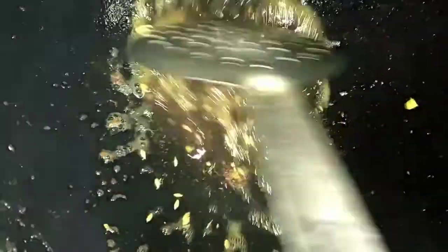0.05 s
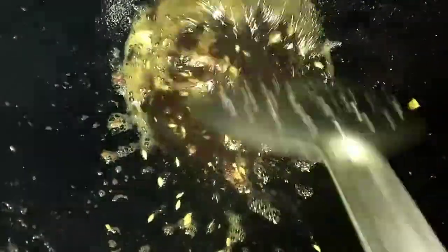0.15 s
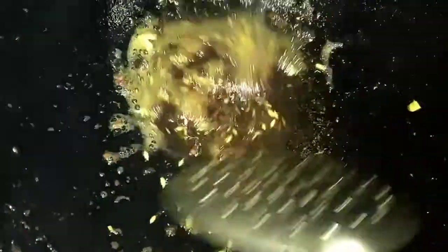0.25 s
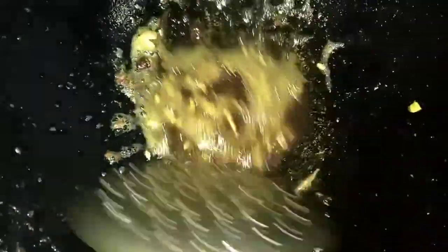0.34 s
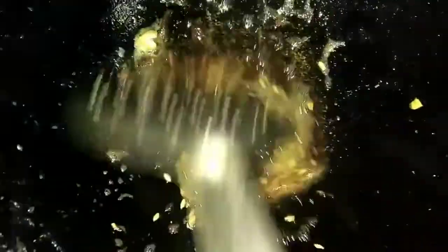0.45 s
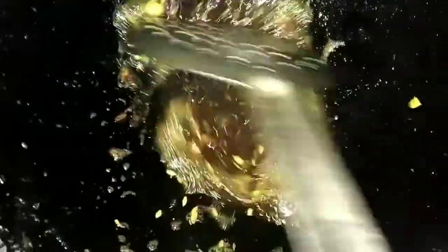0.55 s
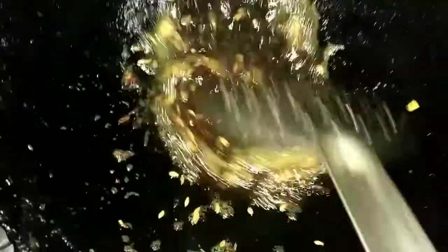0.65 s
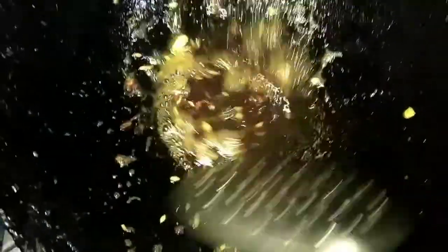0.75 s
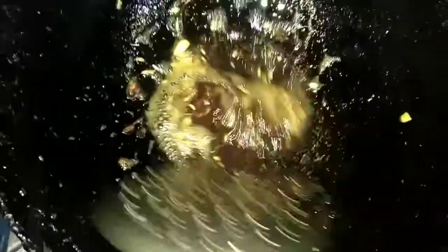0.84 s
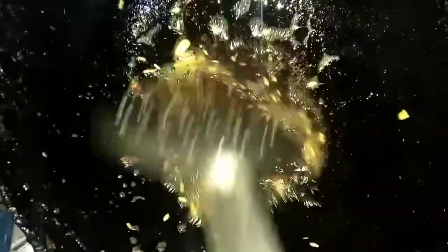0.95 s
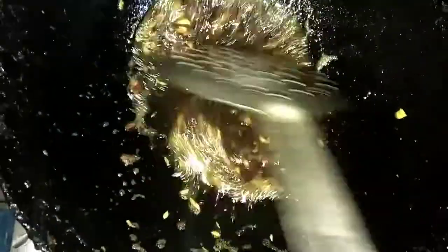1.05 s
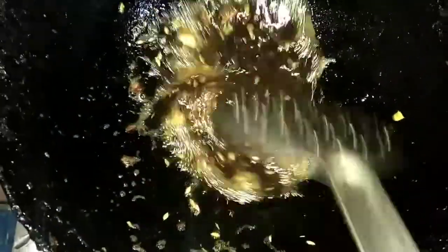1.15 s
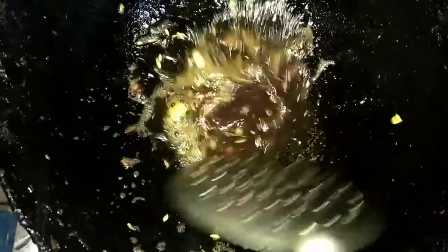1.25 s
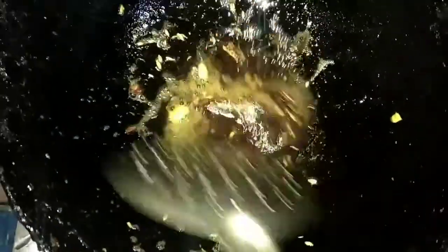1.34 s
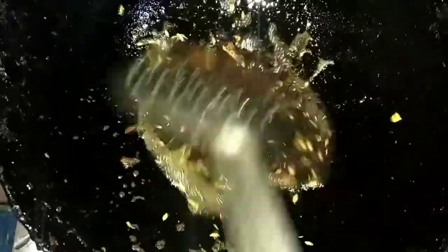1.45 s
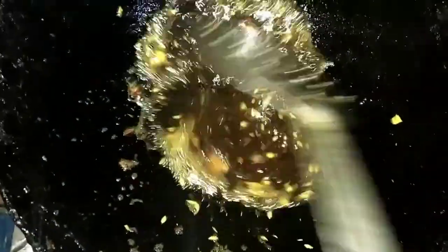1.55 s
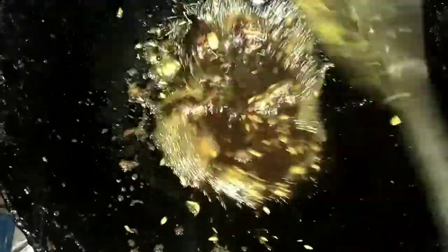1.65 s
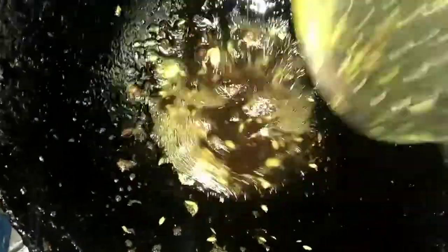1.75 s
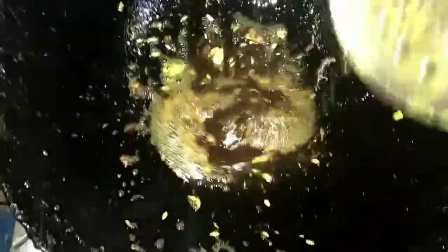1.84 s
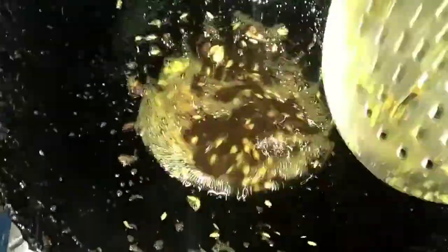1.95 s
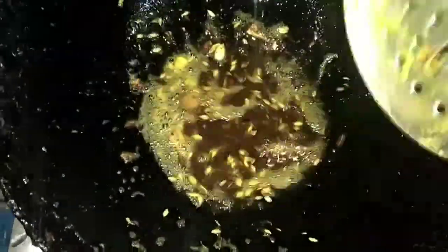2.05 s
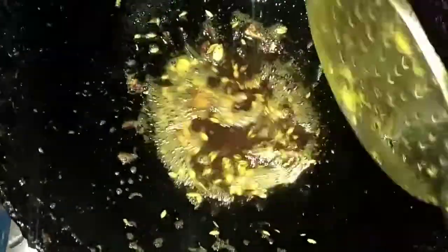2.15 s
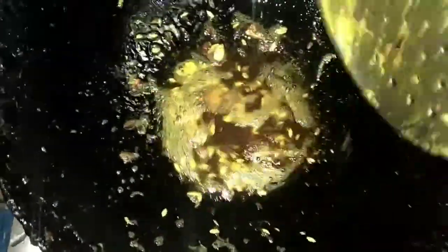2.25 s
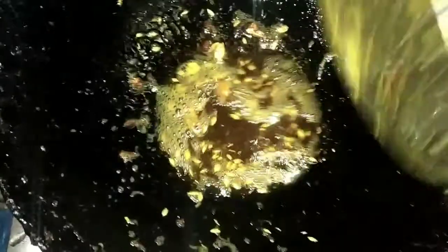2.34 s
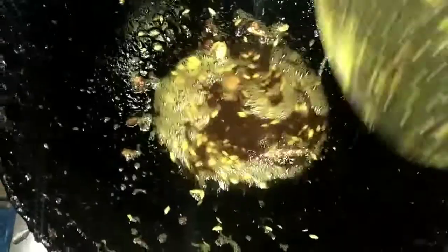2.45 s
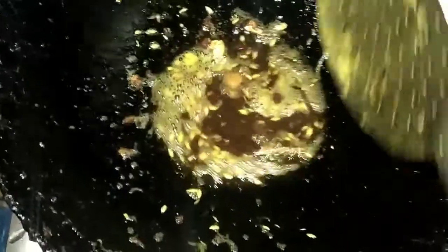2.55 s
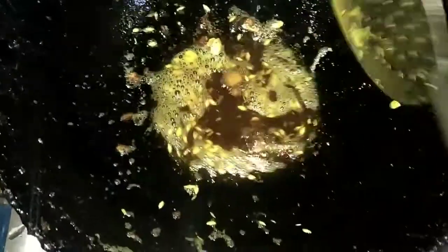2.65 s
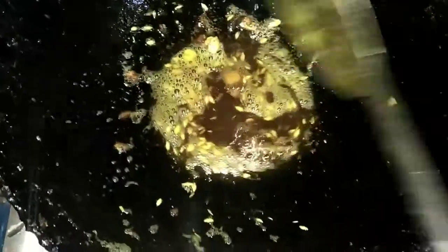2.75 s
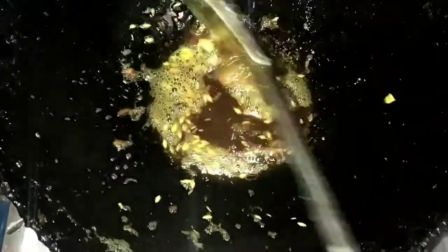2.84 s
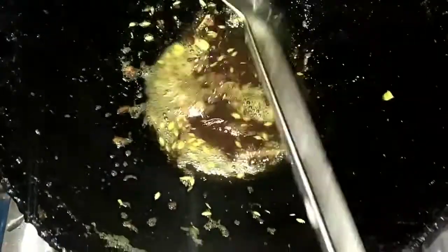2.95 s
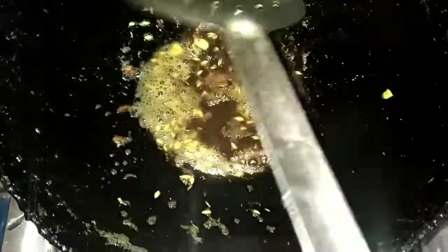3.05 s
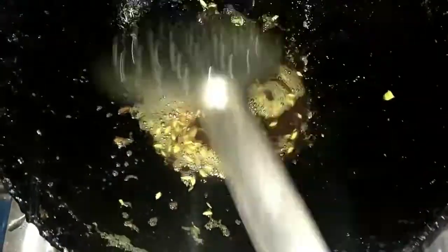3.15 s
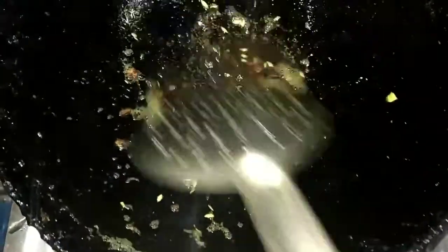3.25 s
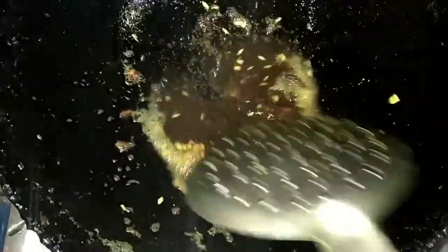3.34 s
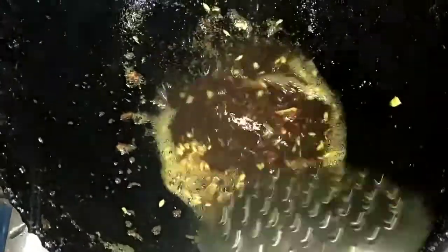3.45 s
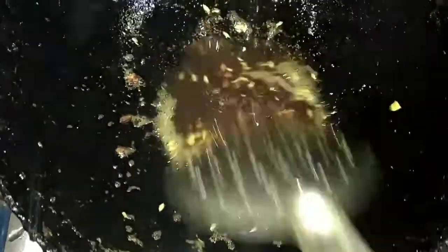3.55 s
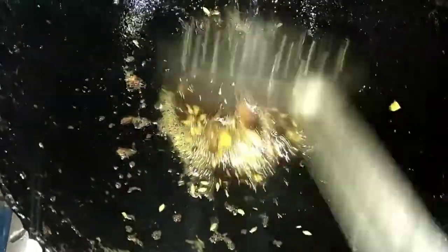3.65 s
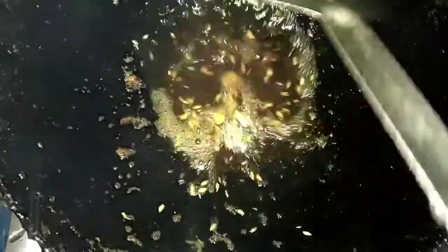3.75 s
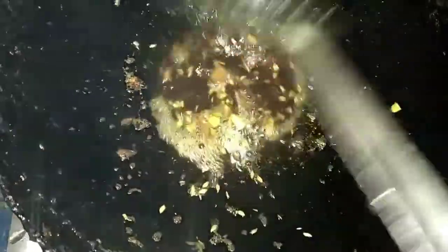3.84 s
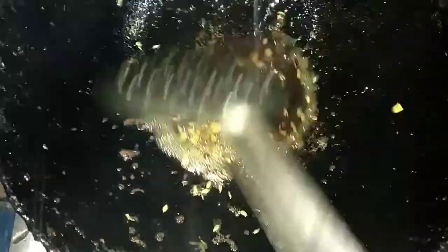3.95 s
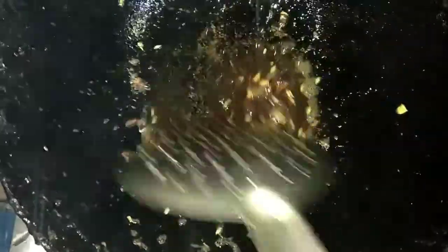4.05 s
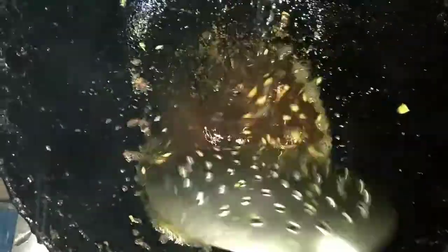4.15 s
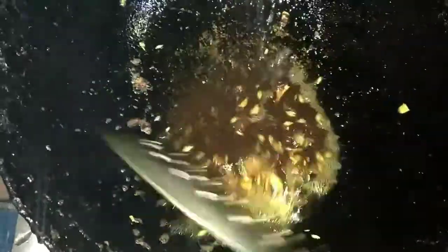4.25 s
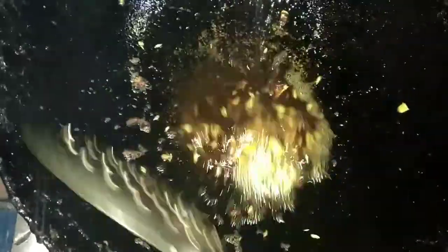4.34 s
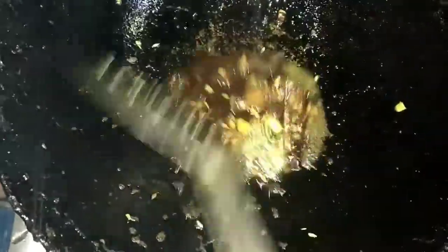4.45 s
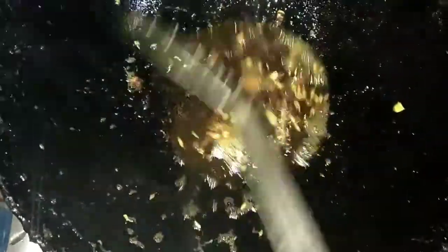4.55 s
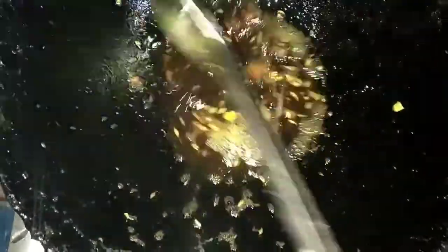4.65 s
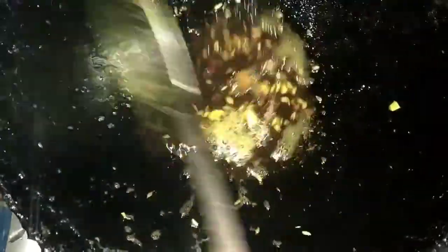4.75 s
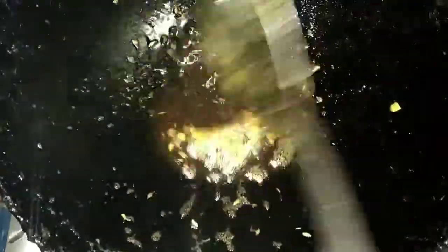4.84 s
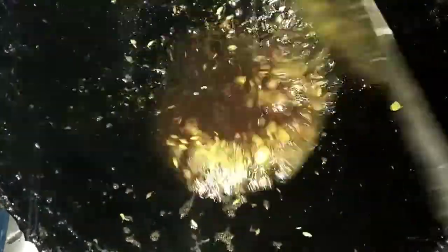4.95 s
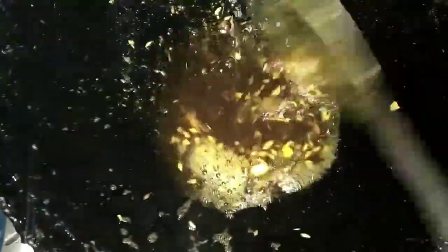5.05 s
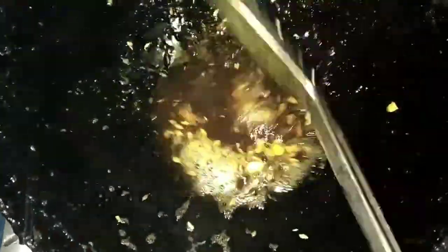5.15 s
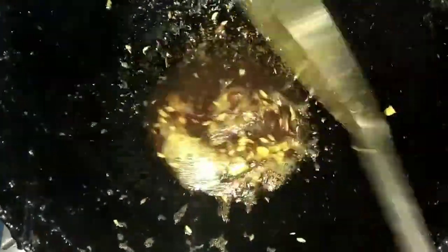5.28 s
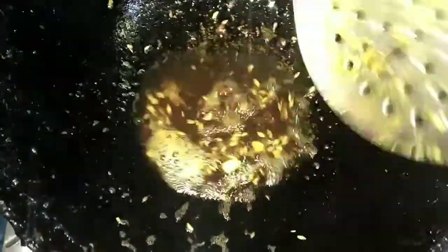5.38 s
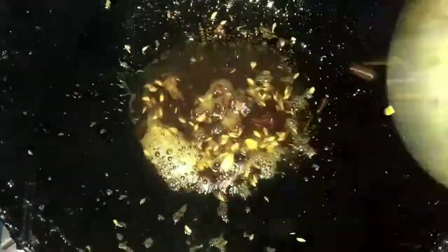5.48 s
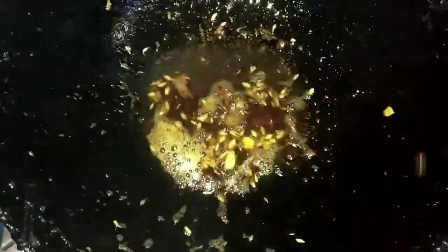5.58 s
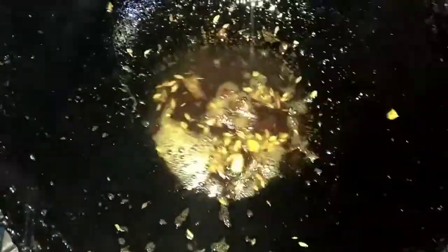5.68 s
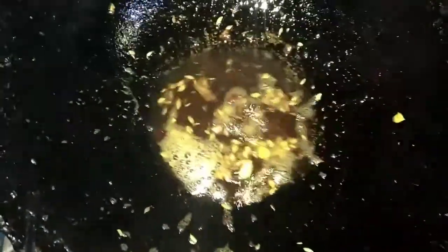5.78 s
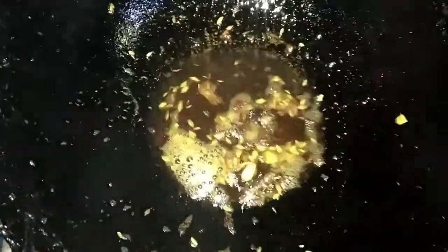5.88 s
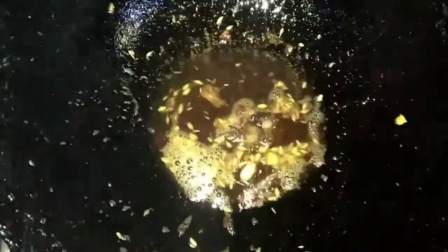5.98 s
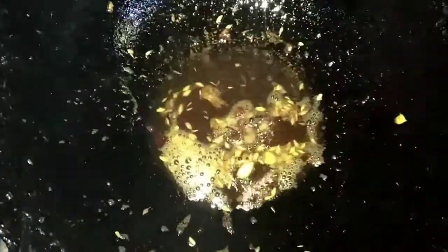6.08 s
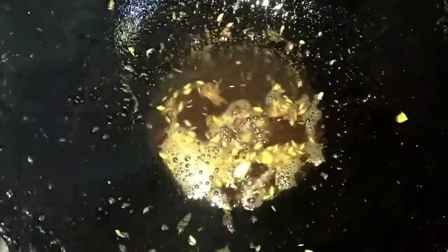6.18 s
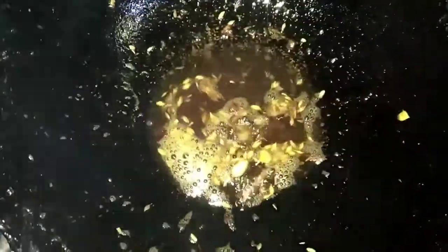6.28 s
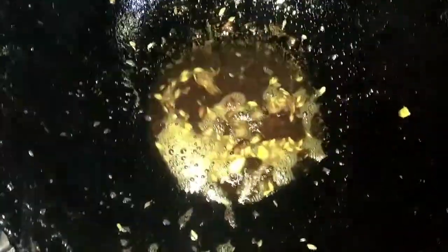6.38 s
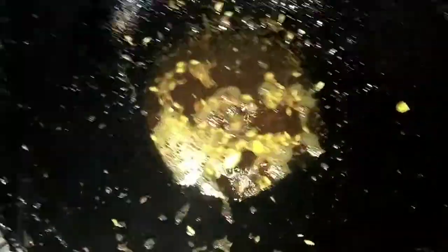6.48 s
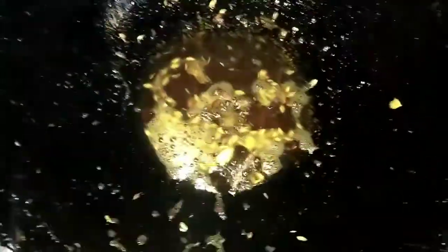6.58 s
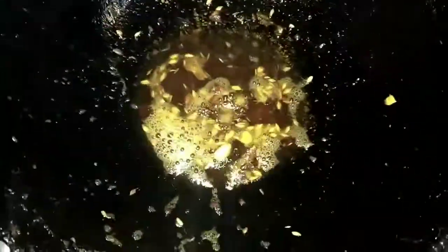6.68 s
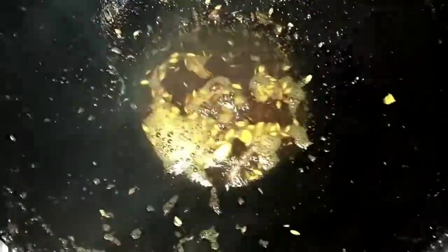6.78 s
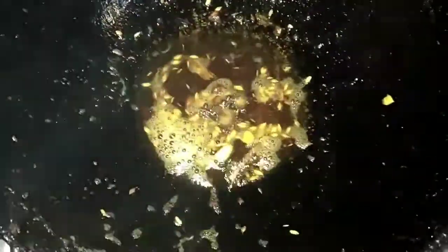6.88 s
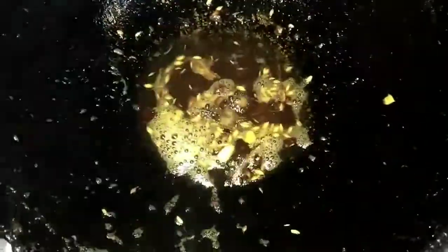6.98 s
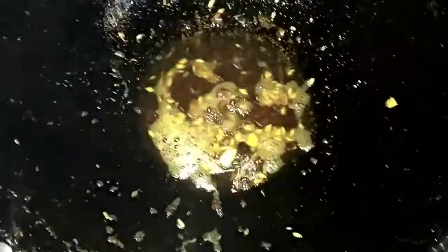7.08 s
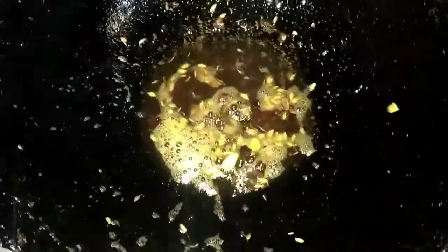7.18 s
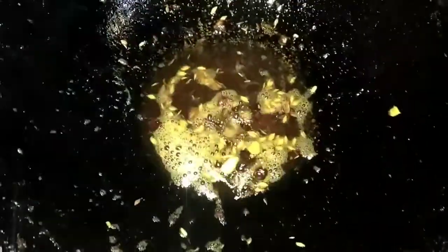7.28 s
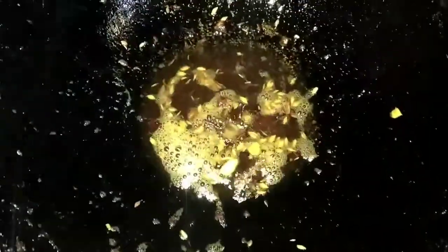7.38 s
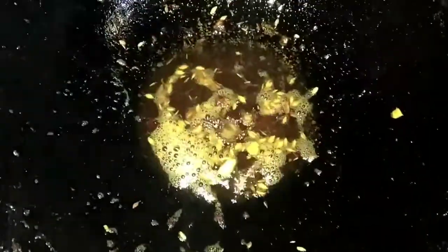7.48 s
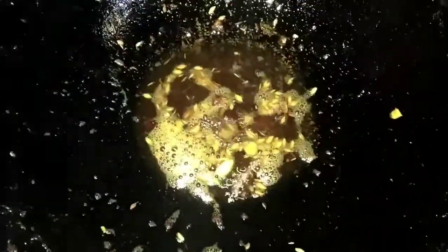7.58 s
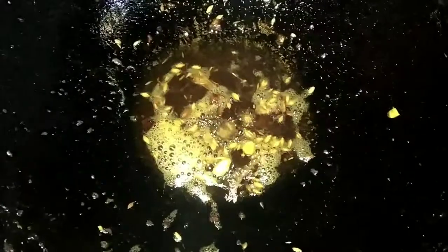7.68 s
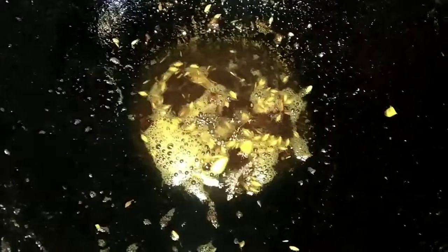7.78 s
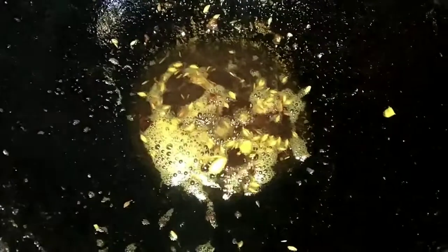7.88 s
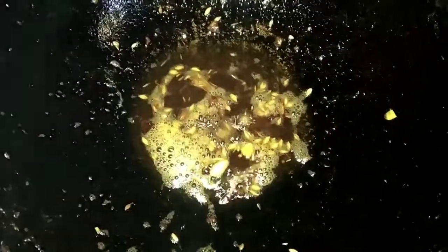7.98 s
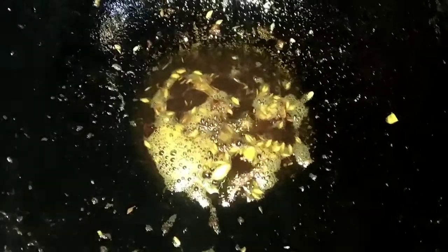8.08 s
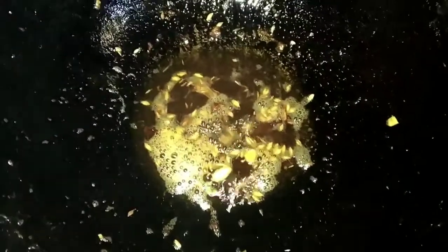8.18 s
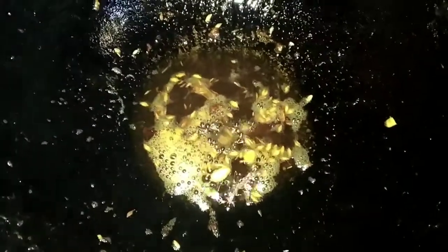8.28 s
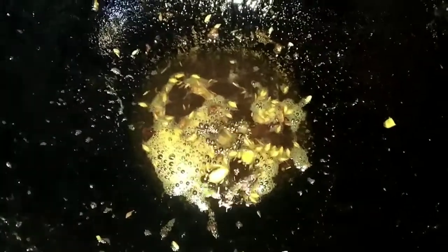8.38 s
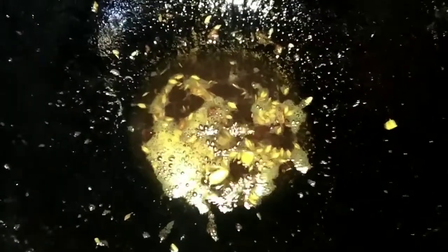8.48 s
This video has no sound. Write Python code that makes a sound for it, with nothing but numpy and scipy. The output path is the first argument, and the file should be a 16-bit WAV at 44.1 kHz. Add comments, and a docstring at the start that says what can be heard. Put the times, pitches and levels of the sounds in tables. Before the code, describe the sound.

Whole spices fizz and spit in hot oil while a steel skimmer scrapes and knocks the pan, then rattles as it is laid down.

```python
"""In a small, hard-walled kitchen, whole spices fry in a steel pan close under two microphones.
Thousands of tiny bubbles make the hot oil fizz, and it spits in short, sharp snaps. A steel skimmer
stirs, scrapes and knocks, setting the metal ringing, then rattles as it is laid down. Further off a
utensil clinks. There is a low room murmur, handling rumble and one faint hoot. The left microphone is
a little further from the pan, so it hears the pan slightly later and softer."""
import sys
import numpy as np
from scipy import signal
from scipy.fft import rfft, irfft, next_fast_len
from scipy.io import wavfile
from scipy.ndimage import uniform_filter1d

SR = 44100
rng = np.random.default_rng(int(sys.argv[2]) if len(sys.argv) > 2 else 0)


def log_audio(samples):
    """Write samples as a 16-bit WAV file to the path given in sys.argv[1]."""
    # one column per channel
    frames = np.atleast_2d(samples).T
    # limit to full scale, then quantise
    limited = np.clip(frames, -1, 1)
    pcm = np.round(limited * 32767).astype(np.int16)
    wavfile.write(sys.argv[1], SR, pcm)


N = 375682


def gain_of(db):
    return 10 ** (np.asarray(db) / 20)


def unit_rms(x):
    return x / np.sqrt(np.mean(x ** 2) + 1e-20)


def unit_peak(x):
    return x / abs(x).max()


def value_at(points, hz):
    """Read between the (frequency, value) points of a curve."""
    f, value = np.transpose(points)
    return np.interp(np.log(hz + 1), np.log(f + 1), value)


def add(mix, start_s, sound):
    part = mix[..., round(start_s * SR):][..., :sound.shape[-1]]
    part += sound[..., :part.shape[-1]]


def follow(rows, column):
    """Turn a dB column into a gain for each sample, silent outside its rows."""
    rows, gain = np.asarray(rows), np.zeros(N)
    t = np.arange(rows[0, 0], rows[-1, 0], 1 / SR)
    add(gain, t[0], gain_of(np.interp(t, rows[:, 0], rows[:, column])))
    return gain


def excite(drive, response):
    """Every sample of the drive sets off its own copy of the response."""
    return signal.oaconvolve(drive, response)[:N]


def colour(x, spectrum):
    """Give a sound a tone colour, using a filter of energy 1 that never sounds ahead of its input."""
    log_gain = np.log(gain_of(value_at(spectrum, abs(np.fft.fftfreq(8192, 1 / SR)))))
    taps = np.fft.ifft(np.exp(np.conj(signal.hilbert(log_gain)))).real[:4096]
    return excite(x, taps / np.linalg.norm(taps))


def stereo_pair(a, b, likeness):
    """Left is a; right blends a (likeness 1) with b (likeness 0), frequency by frequency."""
    size = next_fast_len(len(a))
    same = np.clip(value_at(likeness, np.fft.rfftfreq(size, 1 / SR)), -1, 1)
    right = irfft(same * rfft(a, size) + np.sqrt(1 - same ** 2) * rfft(b, size), size)
    return np.array([a, right[:len(a)]])


def ring(modes, spot_db=0):
    """Struck metal rings with its own tones (modes); t60 is the time each takes to fade by 60 dB."""
    hz, db, t60 = np.transpose(modes)[:, :, None]
    t = np.arange(0, min(t60.max(), .6), 1 / SR)
    db = db + spot_db + 1.5 * rng.standard_normal(hz.shape)  # each blow lands at another spot
    sound = (gain_of(db - 60 * t / np.maximum(t60, .01)) * np.sin(2 * np.pi * hz * t)).sum(0)
    return sound / np.linalg.norm(sound)


def gripped(modes, pitch_share=.012, spread_db=4):
    """Each contact bends the modes a little in pitch and level."""
    spread = [[pitch_share * hz, spread_db, 0] for hz, _, _ in modes]
    return np.array(modes) + rng.standard_normal((len(modes), 3)) * spread


def clicks(per_s, spread_db):
    """Clicks at random moments, a few of them large."""
    when, luck, sign = rng.random((3, N // 4))[:, :round(per_s * N / SR)]
    size = gain_of(spread_db * np.minimum(-np.log(luck + 1e-9), 5)) * (2 * sign - 1)
    return unit_rms(np.bincount((when * N).astype(int), size, N))


def flicker(length, smooth_samples, depth_db):
    """A gain that wavers at random."""
    return gain_of(depth_db * unit_rms(uniform_filter1d(rng.standard_normal(length), smooth_samples)))


def pressure(rows, column, fall_scale=1):
    """Gain of all contacts: up 20 dB per rise time, held, then down 20 dB per scaled fall time."""
    out = np.zeros(N)
    for row in rows:
        s, rise, hold, fall = row[0], max(row[1], .001), max(row[2], 0), max(row[3], .003) * fall_scale
        t = np.arange(max(-2 * rise, -s), hold + 3 * fall, 1 / SR)
        shape_db = 20 * (np.minimum(t / rise, 0) - np.maximum(t - hold, 0) / fall)
        add(out, s + t[0], gain_of(row[column] + shape_db))
    return out


MURMUR_COLOUR = [(12, -102), (20, -23), (34, 0.5), (65, 3), (107, -6), (150, -4.5), (436, -15.5),
                 (474, -14.5), (561, -8), (649, -16.5), (853, -15.5), (1350, -20), (3000, -19), (3900, -53),
                 (6600, -120)]  # tone of the murmur: f/Hz, level/dB
MURMUR_LEVEL = [(0.0, -50.5), (1.56, -48.5), (1.83, -58.5), (2.8, -55.5), (3.98, -47), (4.8, -58.5),
                (5.1, -46), (5.5, -58.5), (6.7, -53.5), (7.2, -57.5), (8.52, -56)]  # room murmur plus handling rumble: t/s, level/dB
MURMUR_LIKENESS = [(60, 0.83), (300, 0.83), (700, 0.28), (1400, 0.0097)]  # how alike left and right are: f/Hz, likeness/0-1
def murmur():
    """Low room murmur, plus handling rumble while the cook stirs; left and right share the bass."""
    a, b = (colour(rng.standard_normal(N), MURMUR_COLOUR) for _ in range(2))
    return follow(MURMUR_LEVEL, 1) * stereo_pair(a, b, MURMUR_LIKENESS)


ECHO_DECAY = [(60, .35), (300, 0.45), (1000, 0.069), (4000, 0.048), (12000, 0.087)]  # how long the kitchen echoes: f/Hz, t60/s
ECHO_LEVEL = [(60, -64.5), (300, -10.5), (1000, -6.5), (4000, 7), (12000, 15)]  # the echo against the sound sent into it: f/Hz, level/dB
ECHO_LIKENESS = [(60, 0.93), (500, 1), (1200, 1), (3000, 0)]  # how alike left and right echoes are: f/Hz, likeness/0-1
BOUNCES = [(.0045, -12), (.0065, -13), (.009, -14), (.013, -17)]  # first echoes, off the pan walls and hob: rough delay/s, level/dB
def echo_pattern():
    """The kitchen's answer to a click: a few near bounces, then a tail fading at each pitch's own rate."""
    length, gap = SR // 3, 20  # samples
    taps = np.zeros((2, length))
    at = np.arange(200, length - gap, gap) + rng.integers(0, gap, (2, (length - 201) // gap))
    np.put_along_axis(taps, at, rng.choice([-1., 1.], at.shape), 1)
    hz, t, bands = signal.stft(stereo_pair(*taps, ECHO_LIKENESS), SR, nperseg=256)
    fade = gain_of(-60 * t / np.maximum(value_at(ECHO_DECAY, hz), .02)[:, None])
    energy = (fade ** 2).sum(1, keepdims=True) * 128 / gap
    fade *= gain_of(value_at(ECHO_LEVEL, hz))[:, None] / np.sqrt(energy)
    tail = signal.istft(bands * fade, SR, nperseg=256)[1]
    for s, db in BOUNCES:
        delays = s * SR * rng.uniform(.8, 1.2) * rng.uniform(.95, 1.05, 2)
        tail[[0, 1], np.round(delays).astype(int)] += gain_of(db)
    return tail


def kitchen(x, patterns=3, changes_per_s=9):
    """The contact point wanders, so the echoes fade from one pattern to the next."""
    place = np.arange(N) / SR * changes_per_s % patterns
    out = np.zeros((2, N))
    for k in range(patterns):
        away = np.minimum(abs(place - k), patterns - abs(place - k))
        share = np.cos(np.pi / 2 * np.minimum(away, 1))
        out += signal.oaconvolve(x * share, echo_pattern(), axes=1)[:, :N]
    return out


HOOT = (2.61, 455, -57, .08)  # one short, soft tone: t/s, f/Hz, level/dB, length/s
def hoot():
    """A faint tone swells and fades."""
    s, hz, db, length = HOOT
    out, t = np.zeros(N), np.arange(0, length, 1 / SR)
    add(out, s, gain_of(db) * np.sin(np.pi * t / length) * np.sin(2 * np.pi * hz * t))
    return out


UTENSIL_MODES = [(729, -6, .32), (772, -6, .28), (827, -10, .2), (1458, 0, .3), (1992, -13, .26),
                 (2240, -13, .24), (2868, -12, .36), (4657, -14, .3), (5020, -22, .2), (7960, -13, .27)]  # tones of the far utensil: f/Hz, level/dB, t60/s
CLATTER_COLOUR = [(450, -18), (750, 6.5), (1100, 3.5), (1500, 6.5), (2200, 14), (2900, -1), (3400, 0),
                  (9000, -5), (13000, -63)]  # the noise around those tones: f/Hz, level/dB
# Each clink: t/s, level/dB, low modes/dB, middle mode/dB, top modes/dB, clatter above the ring/dB,
# swell/s, left minus right/dB
CLINKS = [(.83, -30.5, -16, -8, -9, -3, 0.051, 7), (1.309, -23.5, -8, -5, -3, -17, 0.02, 3),
          (2.185, -45, -33.5, -29, -18, 2.5, 0.0022, 7.5), (2.345, -46, -1, -24, -20, 4, 0.23, 9),
          (2.401, -29.5, -29, 7.5, -13, -2.5, 0.059, 5), (8.335, -25, -1.5, -3, -0.5, -6, 0.065, 7)]
def clinks(instant_share=.3, clatter_t60=.38):
    """Blows on a far utensil swell briefly: a few clear tones over a dense clatter."""
    out, t = np.zeros((2, N)), np.arange(SR // 2) / SR
    for s, db, low_db, middle_db, top_db, clatter_db, swell_s, side_db in CLINKS:
        tones = ring(UTENSIL_MODES, np.repeat([low_db, 0, middle_db, top_db], [3, 3, 1, 3])[:, None])
        tones *= 1 - (1 - instant_share) * np.exp(-2 * t[:len(tones)] / swell_s)
        tones *= flicker(len(tones), 500, depth_db=1.5)
        envelope = (1 - np.exp(-4 * t / swell_s)) * gain_of(-60 * t / clatter_t60)
        clatter = colour(rng.standard_normal(len(t)) * envelope, CLATTER_COLOUR)
        stereo_db = db + np.array([[.5], [-.5]]) * side_db
        add(out, s, gain_of(stereo_db) * unit_peak(tones))
        add(out, s, gain_of(stereo_db + clatter_db) * unit_peak(clatter))
    return out


ROCKING_COLOUR = [(15, -27.5), (25, -16), (59, -46.5), (81, 12), (128, 6.5), (156, 7), (188, -1.5),
                  (214, -4.5), (292, -2.5), (400, -8), (520, -18), (880, -120)]  # rumble of the whole pan rocking: f/Hz, level/dB
BODY_COLOUR = [(130, -27.5), (220, -17.5), (294, -21.5), (425, -5.5), (487, -5.5), (545, 1), (647, -8.5),
               (748, -3.5), (801, -0.5), (950, -11.5), (1020, -5.5), (1280, -9), (1420, -3.5), (1550, -7),
               (1700, -18.5), (2210, -45.5), (3740, -120)]  # rasp of the pan's body: f/Hz, level/dB
EDGE_COLOUR = [(760, -38.5), (1300, 5.5), (1410, 0), (1600, 10), (1920, 16), (2060, 9.5), (2680, 10),
               (3040, 2.5), (5150, -3.5), (6350, -0.5), (7670, -3), (8340, -2), (11500, -15), (14600, -18),
               (15300, -38), (16000, -16)]  # hiss of the skimmer's thin edge: f/Hz, level/dB
PAN_MODES = [(130, -3, .3), (186, -1, .8), (247, -5, .2), (335, -4, .15), (433, -3, .2), (540, -1, .15),
             (772, -3, .1), (1003, -10, .1), (1224, -8, .1)]  # tones of the pan, the three deep ones first: f/Hz, level/dB, t60/s
SKIMMER_MODES = [(1680, -5, .1), (1900, -5, .1), (2460, -7, .1), (2770, 2, .09), (2850, -1, .12),
                 (3660, -2, .12), (3860, -5, .1), (4170, -5, .1), (4880, -1, .1), (5640, -2, .09),
                 (5960, -5, .08), (6480, -2, .07), (6850, -3, .07)]  # tones of the skimmer: f/Hz, level/dB, t60/s
# How freely the metal rings as the cook's hold changes: t/s, deep pan tones/dB, skimmer/dB
RING_FREEDOM = [(0, -10, -4), (0.8, -10, -5), (1.3, -13, -5), (2.8, -15, -2), (2.91, -9, 5),
                (3.16, -12, -3), (3.33, -6, 3), (3.63, -5, -7), (3.92, -9, -6), (4.07, 3, -3),
                (4.43, -9, -2), (4.56, -6, 0), (4.84, -3, 0), (4.9, 6, 6), (5.12, -3, 0), (5.16, -5, 4),
                (6.0, -8, -4), (8.52, -8, -4)]
# Each press of the skimmer on the pan: t/s, rise/s, hold/s, fall/s, body/dB, rocking/dB, edge/dB
SCRAPES = [(0.001, 0.011, 0.04, 0.047, -27, -42, -27), (.05, 0.017, 0.078, 0.1, -35.5, -37, -67),
           (.26, 0.14, .01, 0.057, -26, -80, -30), (.304, 0.015, 0.035, 0.28, -30, -80, -30),
           (.45, 0.36, 0.052, 0.068, -56, -69, -55), (.558, 0.075, 0.0096, 0.022, -23.5, -31, -24.5),
           (.61, 0.026, 0.041, 0.056, -39.5, -33, -46), (.72, 0.055, 0.0097, 0.025, -43, -64, -66.5),
           (.815, 0.0091, .01, 0.046, -24.5, -50, -27.5), (.85, 0.016, 0.12, 0.15, -39, -60, -37),
           (1.03, 0.09, 0.04, 0.024, -29, -35.5, -32.5), (1.08, 0.02, 0.023, 0.043, -29.5, -52, -32.5),
           (1.125, 0.04, .03, 0.16, -32, -59, -51), (1.234, 0.015, 0.012, 0.0042, -25.5, -69, -46),
           (1.274, 0.003, 0.014, 0.017, -27.5, -68, -38), (1.312, 0.0059, .022, 0.0071, -31.5, -68, -34),
           (1.37, 0.024, 0.14, 0.032, -41.5, -49, -46.5), (1.503, 0.026, 0.06, 0.057, -33.5, -41.5, -44),
           (2.81, 0.0022, 0.018, 0.037, -43.5, -32.5, -62), (2.912, 0.05, 0.0027, 0.015, -30.5, -30.5, -28),
           (3.17, 0.0097, 0.0046, 0.12, -37, -30.5, -41), (3.235, 0.045, 0.044, 0.084, -29, -46, -38),
           (3.325, 0.026, 0.0061, 0.038, -31.5, -49, -22.5),
           (3.572, 0.0073, 0.0033, 0.012, -56, -38.5, -55), (3.632, 0.004, 0.03, 0.029, -37, -56, -31),
           (3.746, 0.01, 0.025, 0.034, -36, -37.5, -42.5), (3.86, .01, 0.0033, 0.017, -39.5, -37, -47.5),
           (3.922, 0.011, 0.0033, 0.035, -30, -23, -78.5), (3.954, 0.0092, 0.0026, 0.016, -38.5, -26, -35),
           (4.006, 0.027, 0.034, 0.031, -19, -59, -30.5), (4.05, 0.014, 0.068, 0.007, -29.5, -36, -30),
           (4.21, 0.053, 0.0079, 0.081, -42.5, -41, -46.5), (4.424, 0.02, 0.018, 0.15, -35.5, -38.5, -42.5),
           (4.556, 0.034, 0.0078, 0.039, -26.5, -46, -31), (4.843, 0.01, .003, 0.08, -28, -40, -43.5),
           (4.89, 0.034, 0.0068, 0.064, -30, -33.5, -36), (5.123, 0.011, 0.0033, 0.012, -53.5, -56, -41),
           (5.16, 0.028, 0.003, 0.018, -31, -29, -31), (5.035, 0.0063, 0.0081, 0.029, -41.5, -44, -56),
           (5.2, 0.029, 0.0061, 0.069, -44, -37, -47)]
def scrapes(spots=6):
    """The edge slips over steel and seeds; the same tiny slips shake the pan and the skimmer."""
    slips, noise = clicks(per_s=1200, spread_db=2.5), rng.standard_normal(N)
    judder = flicker(N, round(.016 * SR), depth_db=3.3)  # the edge catches and lets go in clusters
    slips = unit_rms(slips * judder)
    rubbing = unit_rms(slips + 0.5 * unit_rms(noise * judder))
    body, edge = pressure(SCRAPES, 4), pressure(SCRAPES, 6)
    rocking = pressure(SCRAPES, 5, fall_scale=2.13)
    out = colour(slips * body, BODY_COLOUR) + colour(slips * rocking, ROCKING_COLOUR)
    out += colour(rubbing * edge, EDGE_COLOUR)
    pan_free, skimmer_free = follow(RING_FREEDOM, 1), follow(RING_FREEDOM, 2)
    out += excite(rubbing * rocking * pan_free * gain_of(-5), ring(PAN_MODES[:3]))
    for k in range(spots):  # neighbouring strokes touch at other spots
        on_pan = pressure(SCRAPES[k::spots], 4) * gain_of(-15)
        on_skimmer = pressure(SCRAPES[k::spots], 6) * skimmer_free * gain_of(-7)
        out += excite(rubbing * on_pan, ring(gripped(PAN_MODES[3:])))
        out += excite(rubbing * on_skimmer, ring(gripped(SKIMMER_MODES)))
    return out


# The skimmer knocks on the pan, and last thuds on the counter: t/s, level/dB, f/Hz, tick above thump/dB
KNOCKS = [(0.305, -11, 780, -8), (0.555, -13.5, 525, -23), (0.631, -18.5, 547, 2), (0.727, -19.5, 650, -7),
          (0.812, -20.5, 775, 7), (1.029, -22.5, 557, -4), (1.077, -29, 584, -9), (1.233, -17.5, 760, -0.5),
          (1.271, -15, 537, -7), (2.802, -10.5, 400, -13.5), (2.828, -25, 700, -15),
          (2.896, -17.5, 457, -2), (2.916, -14, 900, -15.5), (3.159, 3.5, 720, -23.5),
          (3.243, -9.5, 420, -16), (3.628, -16.5, 585, -6), (3.743, -23, 338, -9), (3.914, 0, 570, -15.5),
          (3.953, -29, 345, -9), (3.999, -0.5, 630, -21), (4.42, -19.5, 390, -15), (4.437, -15.5, 350, -36),
          (4.553, -16, 436, -24), (4.663, -28, 2070, -9), (4.839, -10.5, 467, -33), (4.852, -18, 450, -18),
          (4.883, -6.5, 400, -35), (4.892, -17, 560, -8), (5.028, -37, 257, 5), (5.15, -6.5, 510, -12),
          (5.174, -29.5, 251, 2), (6.195, -8, 227, -16)]
def knocks():
    """Each hit is a thump and a tick together, with metal ringing on."""
    out, t = np.zeros(N), np.arange(1500) / SR
    times, pan_free_db, skimmer_free_db = np.transpose(RING_FREEDOM)
    for s, db, hz, tick_db in KNOCKS:
        u = 3.78 * hz * (t - .002) - 1.6
        thump = (1 - 2 * u ** 2) * np.exp(-u ** 2)  # dip, peak, dip
        add(out, s, gain_of(db) * thump)
        tick = colour(rng.standard_normal(len(t)) * np.exp(-t / 0.0031), EDGE_COLOUR)
        parts = [(tick_db, tick),
                 (tick_db - 3 + np.interp(s, times, skimmer_free_db), ring(gripped(SKIMMER_MODES))),
                 (-17.5, ring(gripped(PAN_MODES[3:]))),
                 (-33.5 + np.interp(s, times, pan_free_db), ring(PAN_MODES[:3]))]
        for part_db, sound in parts:
            add(out, s + 0.0018, gain_of(db + part_db) * unit_peak(sound))
    return out


# Four ways the skimmer sounds as it is laid down, each: f/Hz, width/Hz, level/dB
HOLLOW_PEAKS = [(546, 47, 10), (1170, 50, 8), (1420, 32, -9)]
THUD_PEAKS = [(226, 30, 4), (140, 60, -8), (495, 28, 0)]
RIM_PEAKS = [(2520, 42, 6), (2770, 19, 3), (3650, 30, -1), (4300, 31, -9), (4370, 99, 10.5), (4920, 31, 1),
             (5660, 45, 0)]
BOWL_PEAKS = [(1830, 14, -11), (2430, 40, 7.5), (3400, 21, 12), (3710, 23, 3), (4500, 23, 2), (5660, 46, 1)]
# Each touch-down: t/s, rise/s, hold/s, fall/s, hollow ring/dB, thud/dB, rim/dB, bowl/dB
RATTLES = [(6.198, 0.0039, 0.016, 0.028, -39, -20.5, -58, -69),
           (6.24, 0.02, 0.023, 0.16, -64, -33.5, -55.5, -66),
           (6.508, 0.02, 0.017, 0.029, -41.5, -37.5, -53, -59),
           (6.549, 0.0024, 0.0036, 0.065, -32, -39, -37.5, -46),
           (6.72, 0.0047, 0.007, .01, -39, -41, -53, -48),
           (6.734, 0.0016, 0.0031, 0.074, -33, -37, -44.5, -36)]
def rattles():
    """The skimmer chatters on a hard top, and the quick clicks set it ringing."""
    chatter = clicks(per_s=2500, spread_db=2.2)
    hollow, thud = pressure(RATTLES, 4), pressure(RATTLES, 5, fall_scale=0.64)
    rim, bowl = pressure(RATTLES, 6), pressure(RATTLES, 7)
    out = gain_of(-8) * colour(chatter * thud, ROCKING_COLOUR)
    out += gain_of(-6.5) * colour(chatter * (rim + bowl), EDGE_COLOUR)
    for push, peaks in ((hollow, HOLLOW_PEAKS), (rim, RIM_PEAKS), (bowl, BOWL_PEAKS), (thud, THUD_PEAKS)):
        # a wider peak dies away sooner
        modes = [(hz, db + 10 * np.log10(width), 1.2 / width) for hz, width, db in peaks]
        out += excite(chatter * push, ring(modes))
    return out


FINE_COLOUR = [(2350, -39), (4000, -7), (5380, -13), (5800, -6.5), (6330, -2), (8650, 3), (10100, 2),
               (14800, -7), (15600, -12.5), (16000, 4.5)]  # tone of the fine bubbles: f/Hz, level/dB
COARSE_COLOUR = [(650, -52), (1100, -14), (1350, -9), (1520, -2), (1830, -24), (2040, -5), (2930, 2),
                 (3620, 0.5), (6000, -2), (7800, -2), (13200, -120)]  # tone of the coarse bubbles: f/Hz, level/dB
FIZZ_LIKENESS = [(1000, 0.2), (4000, 0.11), (12000, 0.19)]  # how alike left and right are: f/Hz, likeness/0-1
# The fizz, lively under the first stirring, then thinning: t/s, fine bubbles/dB, coarse bubbles/dB
FIZZ_LEVEL = [(0.0, -31.5, -30), (0.16, -33, -44), (0.31, -26.5, -29.5), (0.45, -32.5, -40),
              (0.83, -30.5, -44), (1.08, -32.5, -35), (1.42, -35.5, -39), (1.56, -35, -30),
              (1.62, -37.5, -49), (2.2, -41, -54.5), (3.5, -40.5, -50.5), (4.08, -42, -42.5),
              (4.5, -39, -59.5), (5.34, -42, -59.5), (6.95, -43.5, -60), (7.06, -34.5, -46.5),
              (7.18, -42, -57.5), (8.52, -42, -57)]
def fizz(patch_db=2.8):
    """Thousands of tiny bubbles burst all over the foam; patches of pitch come and go as it shifts."""
    a, b = (clicks(per_s=8000, spread_db=1) for _ in range(2))
    fine, coarse = follow(FIZZ_LEVEL, 1), follow(FIZZ_LEVEL, 2)
    foam = [fine * colour(bubbles, FINE_COLOUR) + coarse * colour(bubbles, COARSE_COLOUR)
            for bubbles in stereo_pair(a, b, FIZZ_LIKENESS)]
    bands = signal.stft(foam, nperseg=256)[2]
    patches = rng.standard_normal(bands.shape[:0:-1]).T
    patches = uniform_filter1d(patches, size=10, axis=0)  # smooth across pitch
    patches = unit_rms(uniform_filter1d(patches, size=8, axis=1))  # and across time
    return signal.istft(bands * gain_of(patch_db * patches), nperseg=256)[1][:, :N]


def faint_spits(count=45, low_hz=6000, high_hz=11000):
    """Rows like SNAPS for the many faint spits of oil, at random moments, pitches and places."""
    when, luck, pitch, side = rng.random((count, 4)).T
    db = -39 - 3 * np.log(luck + 0.039)
    return list(zip(when * N / SR, db, low_hz + (high_hz - low_hz) * pitch, 4 * (2 * side - 1)))


# High spits of oil and a few lower skimmer ticks: t/s, level/dB, f/Hz, left minus right/dB
SNAPS = [(0.0395, -4, 5950, -2), (0.1205, -8.5, 8370, 0), (0.19, -13.5, 7800, 1), (0.236, -9.5, 8800, 3),
         (0.258, -4, 8700, 2), (0.383, -13, 5500, 6), (0.641, -18, 3500, 1), (0.709, -19.5, 8600, -2),
         (0.773, -15.5, 5700, -4), (0.8187, -20.5, 2980, -9), (0.964, -15.5, 8850, 3),
         (1.03, -18, 6570, -17), (1.3108, -13, 4300, 1), (1.473, -15, 7250, -3), (1.826, -27, 8950, -3),
         (1.8591, -8, 7260, 0), (1.8936, -28, 9400, -2), (1.897, -16, 11500, 8), (2.109, -25, 10900, 5),
         (2.167, -18.5, 10400, -2), (2.212, -9, 11300, -1), (2.42, -22, 8600, 0), (2.737, -16.5, 9200, 2),
         (2.808, -15, 7260, 1), (2.878, -22, 10100, 0), (2.9743, -17.5, 10850, 2.5),
         (3.2096, -20.5, 5070, -4), (3.566, -18, 3820, -5), (3.576, -20, 6330, 4),
         (3.631, -19.5, 2110, -10.5), (3.74, -19.5, 3240, -5.5), (3.7592, -19, 9200, -3),
         (3.838, -18, 10200, -1.5), (3.8536, -11.5, 7570, -1.5), (3.956, -10, 4800, -2),
         (3.985, -8.5, 8460, -2), (4.047, -19, 6130, -23), (4.436, -18.5, 12900, -4),
         (4.5586, -20.5, 2740, -18), (4.6192, -15.5, 8860, 3), (4.732, -21, 8650, 3),
         (4.842, -14.5, 7040, 8), (4.896, -5, 8330, 1), (5.1235, -4, 6700, 0.5), (5.378, -23, 10300, -1),
         (6.203, -19, 9500, 1), (6.482, -26, 12000, 1), (7.059, -19, 10100, 1), (7.556, -33, 11000, -6),
         (7.5765, -15.5, 11650, -6), (8.073, -20, 9800, -1), (8.229, -23, 8300, 1)]
def spits_and_ticks(spray_s=.0018, wander_samples=10):
    """Oil spits and the skimmer ticks: each is a crack, a three-cycle snap and noise around its pitch."""
    out, t = np.zeros((2, N)), np.arange(600) / SR
    crack = np.diff((1 - 55000 * t) * np.exp(-55000 * t), prepend=0)
    for s, db, hz, side_db in SNAPS + faint_spits():
        phase = 2 * np.pi * hz * t
        snap = 1.35 * np.exp(-((hz * t - 2.5) / 1.1) ** 2) * np.sin(phase)
        envelope = np.exp(-t / spray_s) * (1 - np.exp(-(hz * t / 2.5) ** 2))
        wobble = uniform_filter1d(rng.standard_normal((2, 2, len(t))), size=4)
        spray = 0.56 * envelope * (wobble[0] * np.sin(phase) + wobble[1] * np.cos(phase))
        crack_db = -19 + 16 * np.log2(hz / 8000)  # higher snaps crack more sharply
        stereo_db = db + np.array([[.5], [-.5]]) * side_db
        left, right = gain_of(stereo_db) * (snap + spray + gain_of(crack_db) * crack)
        add(out[0], s + rng.uniform(0, wander_samples) / SR, left)  # its place shifts its arrival
        add(out[1], s, right)
    return out


def scene(left_lag_samples=12, left_db=-1.4):
    """The pan reaches the left microphone late, the far utensil both at once; the kitchen echoes."""
    metal = scrapes() + knocks() + rattles() + hoot()
    snaps, far = spits_and_ticks(), clinks()
    left, right = metal + snaps + fizz()
    late_left = np.append(np.zeros(left_lag_samples), left[:-left_lag_samples])
    direct = np.array([late_left, right]) + far
    # the snaps stir the kitchen less than the ringing pan
    echoes = kitchen(metal + gain_of(-3) * far + gain_of(-15) * snaps)
    return (direct + echoes) * gain_of([[left_db], [0]]) + murmur()


def record(dry, low_hz=45, high_hz=15700):
    """The microphones lose the deepest bass; then the highest treble is cut off."""
    thinned = signal.sosfilt(signal.butter(3, low_hz, "high", fs=SR, output="sos"), dry)
    treble_cut = signal.firwin(255, high_hz, window=("kaiser", 9), fs=SR)
    return signal.oaconvolve(thinned, treble_cut[None], "same")


dry = scene()
out = record(dry)
log_audio(out)
```